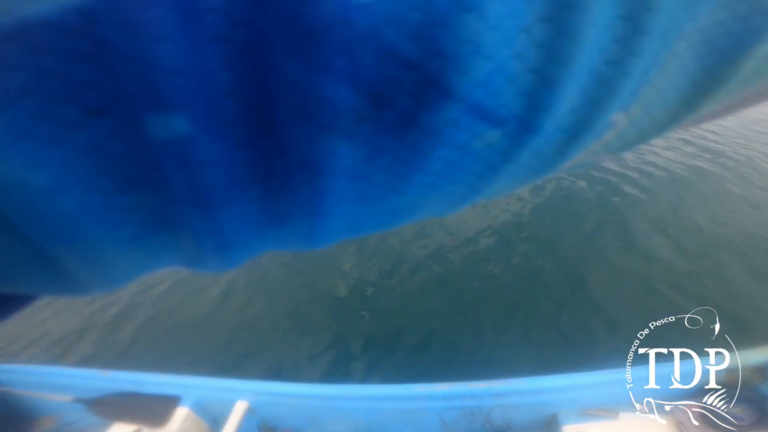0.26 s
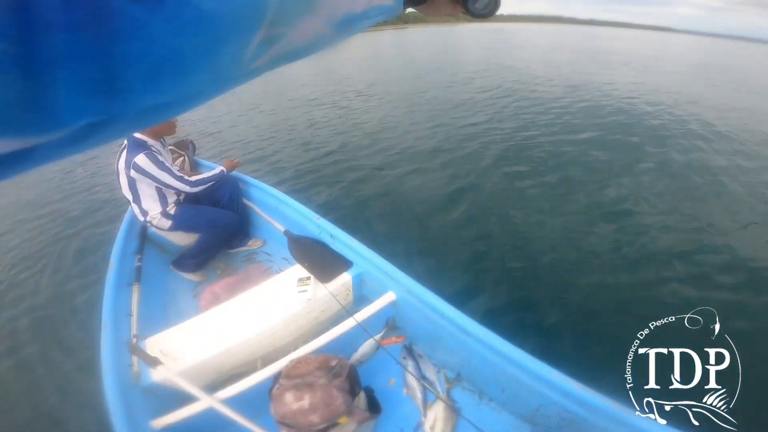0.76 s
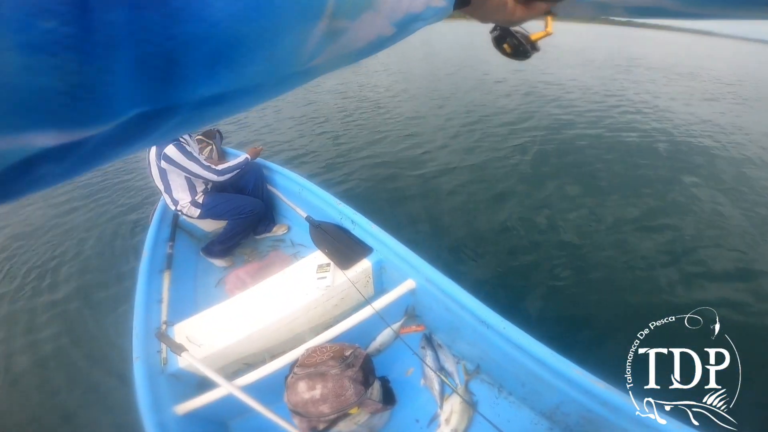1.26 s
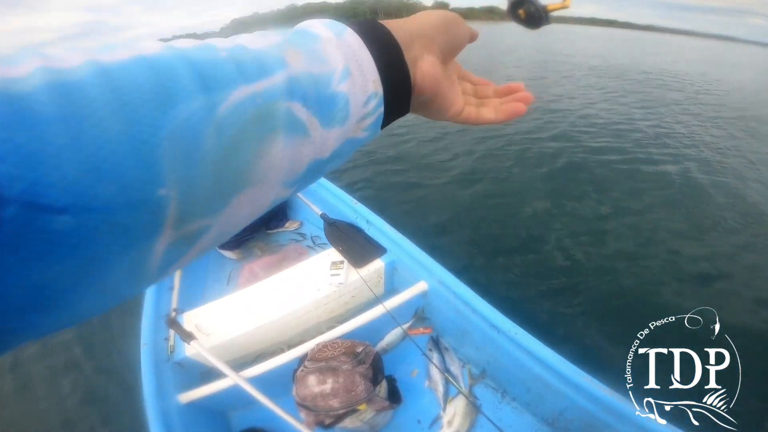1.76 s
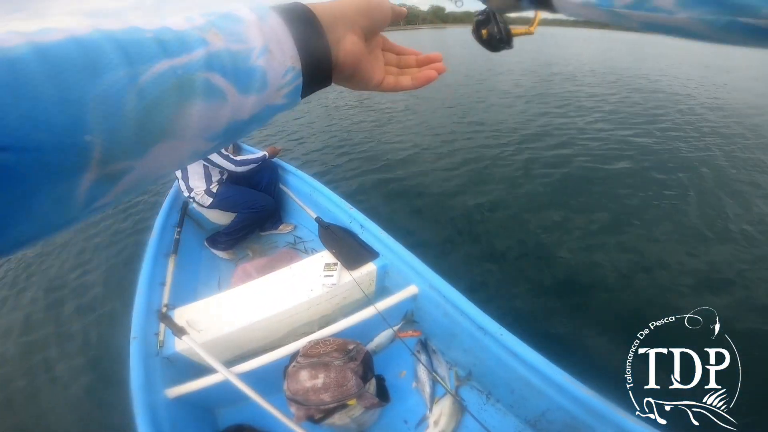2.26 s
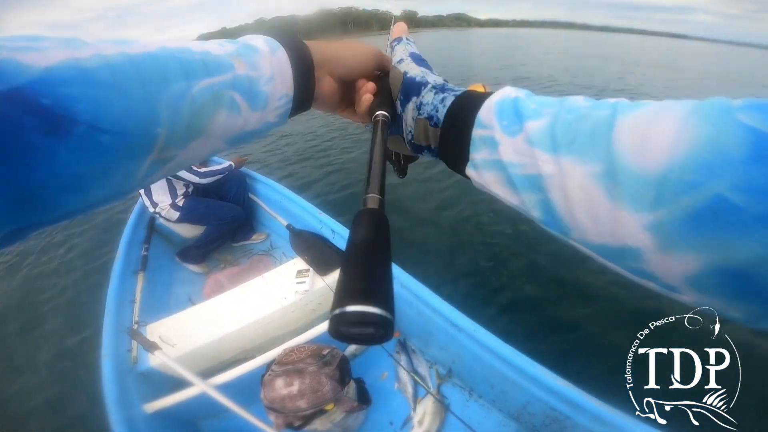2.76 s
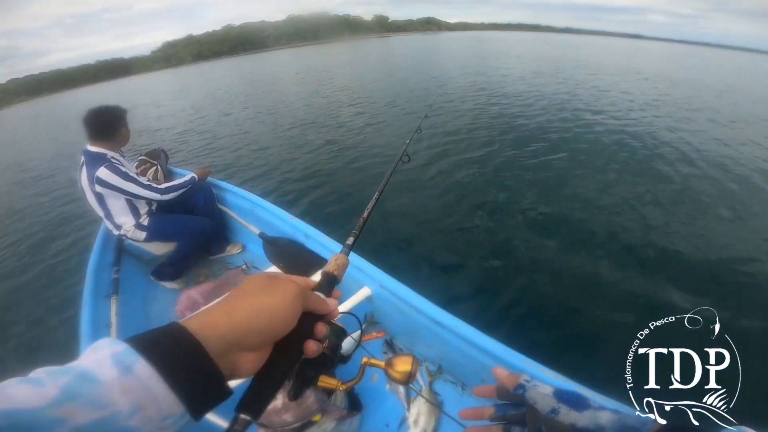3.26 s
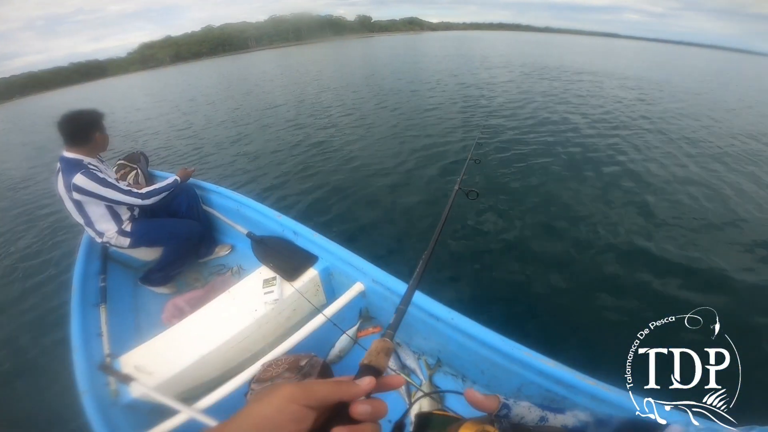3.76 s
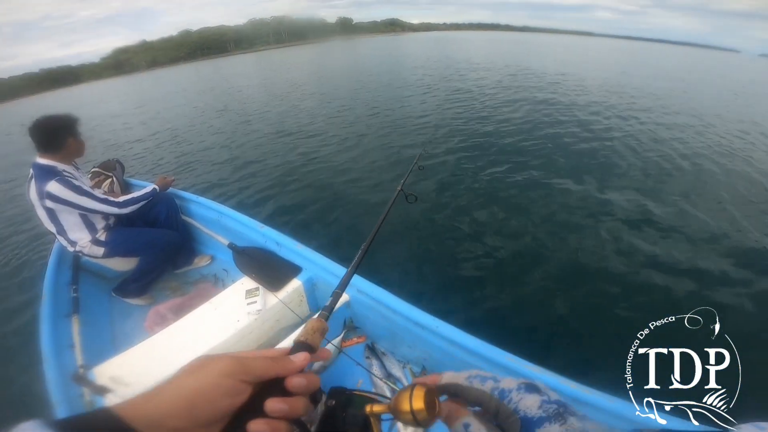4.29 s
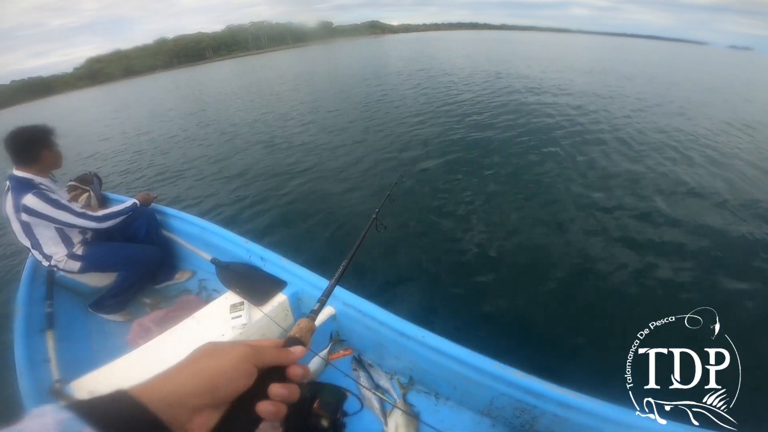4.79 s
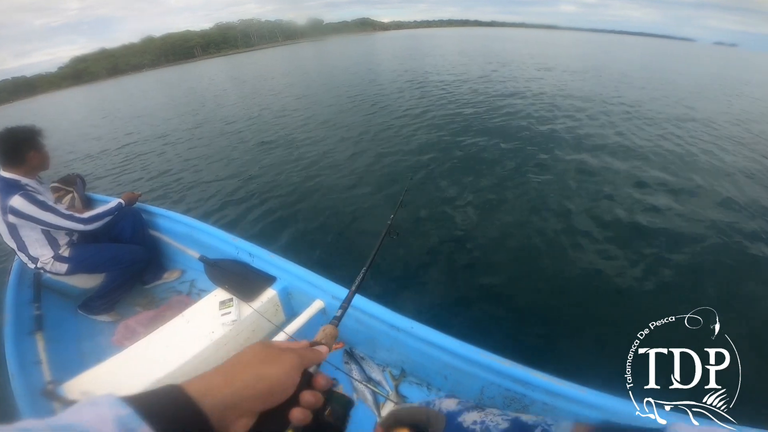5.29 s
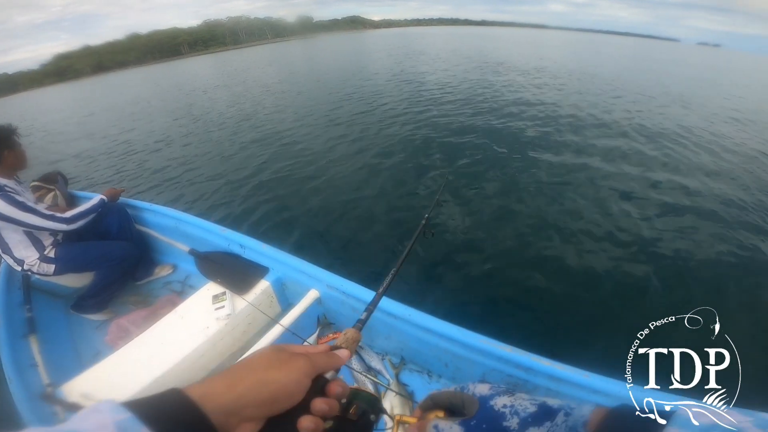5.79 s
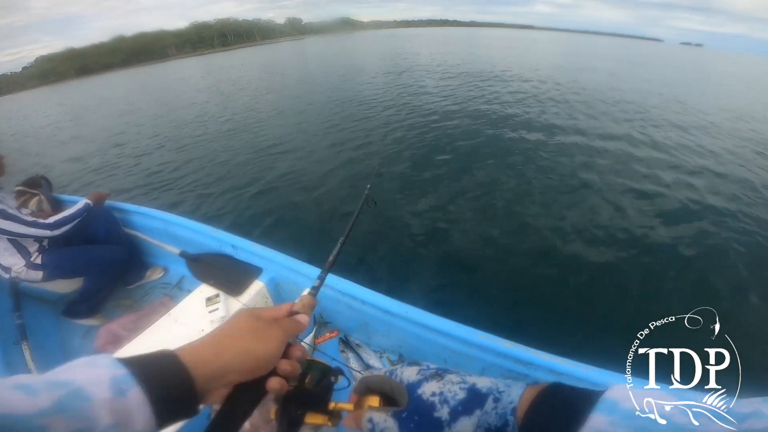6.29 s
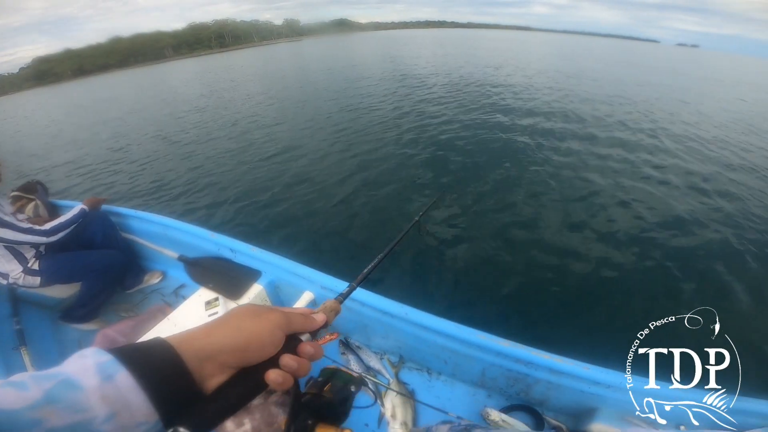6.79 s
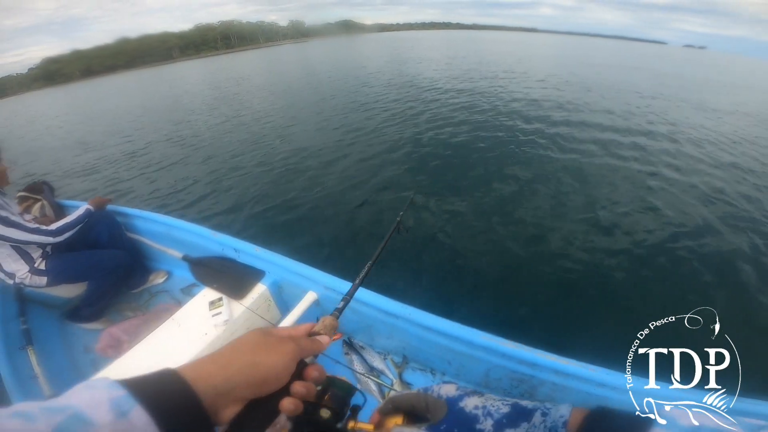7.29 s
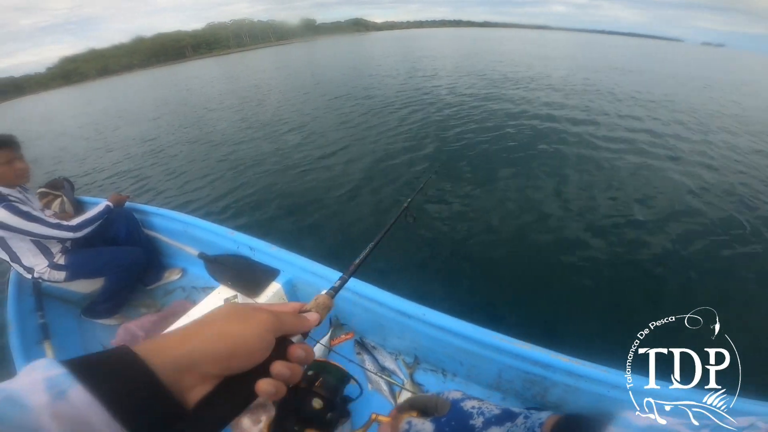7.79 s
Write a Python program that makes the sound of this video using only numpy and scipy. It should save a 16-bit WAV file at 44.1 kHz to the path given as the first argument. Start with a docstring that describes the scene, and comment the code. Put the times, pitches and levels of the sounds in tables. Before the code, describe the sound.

Muffled fabric rub and jolting thumps on a sealed chest-worn camera, scattered ticks, one soft metallic reel snap, faint water wash beneath.

```python
"""Shirt and strap rub, tick and creak on a small sealed camera, strapped to an angler's chest in an open boat.
The rub is clumped noise and the ticks are short grainy blows, both ringing the modes of the housing.
Body jolts and knocks are brief low swings; the reel's bail snaps shut once, as three noise bursts ringing
metal modes. Far below lie a wash of banded noise for water and air, a thin whine, short pure gurgles and hiss.
"""
import sys
import numpy as np
from scipy import signal
from scipy.io import wavfile

SR = 44100
rng = np.random.default_rng(int(sys.argv[2]) if len(sys.argv) > 2 else 0)


def persist_wave(psi):
    """Save psi, clipped to +-1, as 16-bit WAV."""
    counts = np.round(np.clip(psi, -1, 1) * 32767).astype(np.int16)
    wavfile.write(sys.argv[1], SR, np.atleast_2d(counts).T)


N = 355005


def amp(db):
    """Decibels to gain."""
    return 10 ** (np.asarray(db) / 20)


def rms_one(x):
    """Scale to rms 1."""
    return x / np.sqrt(np.mean(x ** 2) + 1e-20)


def drift(rate_hz):
    """Slow chance movement with rms 1: noise through two poles at rate_hz, computed every 20 samples."""
    pole = np.exp(-2 * np.pi * rate_hz * 20 / SR)
    noise = rng.standard_normal(N // 20 + 4002)
    slow = signal.lfilter([1], [1, -2 * pole, pole * pole], noise)[4000:]  # skip the settling
    return np.interp(np.arange(N) / 20, np.arange(len(slow)), rms_one(slow))


def resonate(x, hz, width_hz, lead=0.0):
    """Two-pole resonance with gain near 1 on top, its ringing shifted ahead by lead radians."""
    r, w = np.exp(-np.pi * width_hz / SR), 2 * np.pi * hz / SR
    b = 2 * (1 - r) * np.array([np.cos(lead), -r * np.cos(w - lead)])
    return signal.lfilter(b, [1, -2 * r * np.cos(w), r * r], x + 1e-18)


def bands(spectrum, alike, patchy_db):
    """Stereo noise in half-octave bands, each flickering a little; rms 1."""
    hz, level_db = np.transpose(spectrum)
    edges, out = 30 * 2 ** np.arange(0, 8.6, .5), 0
    white = rng.standard_normal((2, 2, N))
    share = np.clip(alike, 0, 1)
    for k, (low, high) in enumerate(zip(edges, edges[1:])):
        if low < hz[-1]:
            band = signal.butter(3, [low, high], "band", fs=SR, output="sos")
            mid, side = signal.sosfilt(band, white[k % 2])
            level = np.interp(np.log(low * high) / 2, np.log(hz), level_db)
            gain = amp(level + patchy_db * drift(22))
            out = out + gain * (np.sqrt(1 + share) * mid + np.sqrt(1 - share) * side * [[1], [-1]])
    return rms_one(out)


def swings(rows, lopsided):
    """A few swings under a bell-shaped envelope for every row; lopsided is the share of the octave above."""
    t, out = np.arange(N) / SR, np.zeros(N)
    for s, level_db, hz, length in rows:
        near = slice(max(int((s - 2 * length) * SR), 0), int((s + 2 * length) * SR))
        u = t[near] - s
        swing = np.cos(2 * np.pi * hz * u) + lopsided * np.cos(4 * np.pi * hz * u)
        out[near] += amp(level_db) * np.exp(-np.log(16) * (u / length) ** 2) * swing
    return out


# Housing modes, from broad body modes up to the top, shared by ticks and rub:
# (frequency [Hz], nominal width [Hz], left level [dB], right level [dB], lead of right port [rad])
BODY_MODES = [(231, 178, 0, -1.5, 0.05), (589, 320, -3.5, -5.5, -0.2)]
LOW_MODES = [(1005, 133, -3, -5.5, 0.69), (1222, 277, 0.5, -2, 0.48), (1465, 183, -8, -3.5, 1.2),
             (1670, 260, -12, -13.5, 1.5)]
MIDDLE_MODES = [(2264, 880, -1, 0, 2.03), (2872, 328, 4, 0, 1.3), (3440, 370, -4.5, -14, 1.5),
                (3910, 560, -12.5, -11.5, 1.3)]
TOP_MODES = [(5050, 1400, -13, 5.5, 9.3), (6250, 1400, -8.5, -1, 0.8), (7200, 600, -10.5, -19.5, 9)]


def housing(drives, modes):
    """Each mode builds up and dies (a resonance applied twice), with its own level and phase at each port."""
    out = np.zeros((2, N))
    for drive, (hz, width_hz, left_db, right_db, lead) in zip(drives, modes):
        swing = resonate(drive, hz, 1.45 * width_hz)
        out[0] += amp(left_db) * resonate(swing, hz, 1.1 * width_hz)
        out[1] += amp(right_db) * resonate(swing, hz, 0.77 * width_hz, lead)
    return out


# Spectrum of water and air: (frequency [Hz], relative level per Hz [dB])
WASH_SPECTRUM = [(80, -36.5), (115, -28), (160, 2), (350, -9), (583, -11.5), (834, -32.5), (1240, -7.5),
                 (1920, -14), (4170, -35), (5840, -23.5), (9220, -58.5)]


def wash():
    """Water and air: flickering noise bands, mostly unlike at the two ports."""
    return amp(-66.5) * bands(WASH_SPECTRUM, alike=0.24, patchy_db=3.5)


# Faint whine ahead of the membrane: (frequency [Hz], width of each resonance [Hz], left rms level [dB])
WHINE_TONES = [(5695, 12, -81.5), (6835, 12, -85), (9110, 14, -87)]


def whine():
    """Noise through very narrow resonances gives thin unsteady tones, weaker and inverted at the right port."""
    out = 0
    for hz, width_hz, level_db in WHINE_TONES:
        noise = rng.standard_normal(N)
        out = out + amp(level_db) * rms_one(resonate(resonate(noise, hz, width_hz), hz, width_hz))
    return out * [[1], [-.3]]


# Short pure gurgles: (time [s], level [dB], frequency [Hz], length at half height [s])
GURGLE_TONES = [(3.56, -56, 523, .04), (3.74, -57, 436, .06), (3.90, -59, 472, .05),
                (3.95, -58.5, 520, .04), (4.14, -55.5, 516, .04)]


def gurgles():
    """Air pockets ring briefly under the hull, a little louder on the left."""
    return swings(GURGLE_TONES, lopsided=0) * amp([[.7], [-.7]])


# The bail snapping shut: (time [s], relative level [dB], treble tilt about 4 kHz [dB per octave])
BAIL_SNAPS = [(3.981, -26, 10), (3.999, -16.5, 6), (4.019, -35, 0)]
# Metal of the reel: (frequency [Hz], relative level [dB], nominal t60 [s]; it rings 3.8 times shorter)
REEL_MODES = [(1373, -24, 0.097), (1631, -14.5, 0.16), (1820, 4, 0.025), (2100, 4.5, 0.042),
              (2584, 2, 0.051), (2848, 0.5, 0.086), (3080, -13, 0.093), (3520, -0.5, 0.13),
              (3930, 2, 0.067), (5030, -23, 0.13), (5560, -2, 0.091), (6010, -6.5, 0.05),
              (6360, -8.5, 0.097), (6780, -25, 0.092), (7600, -27.5, 0.076), (8258, -25.5, 0.083)]


def bail():
    """Each snap rattles the reel's modes, then scatters about the hull as a short dense tail of noise."""
    s, level_db, tilt_db = np.transpose(BAIL_SNAPS)
    at, age = (s * SR).astype(int), np.arange(2500) / SR
    fade = np.exp(-age / 0.0039) + 0.33 * np.exp(-age / .009)
    rattle = rng.standard_normal((len(at), 2500)) * fade
    out = np.zeros((2, N))
    for hz, mode_db, t60 in REEL_MODES:
        drive, width_hz = np.zeros(N), 3.8 * np.log(1000) / np.pi / t60
        gains = amp(level_db + mode_db + tilt_db * np.log2(hz / 4000) + 9.5)
        for i, burst, gain in zip(at, rattle, gains):
            drive[i:i + 2500] += gain * burst
        left = resonate(drive, hz, width_hz)
        right = resonate(drive, hz, width_hz, lead=rng.uniform(0, 2.56))
        out += [left, right]
    return out


def sway(rumble_db):
    """Deep wobble between jolts: noise rung twice at 19 Hz, following 0.22 of the rumble's swing in dB."""
    hz, width_hz = 19, 12
    wobble = resonate(resonate(rng.standard_normal(N), hz, width_hz), hz, width_hz)
    return amp(-49.5 + 0.22 * (rumble_db + 56)) * rms_one(wobble)


# Jolts through the chest: (time [s], level [dB], frequency [Hz], length at half height [s])
JOLTS = [(0.432, -31.5, 36, 0.17), (0.602, -31.5, 12, 0.091), (0.718, -13.5, 16.3, 0.082),
         (0.802, -12.5, 17.8, 0.16), (0.92, -19, 19, 0.065), (1.063, -22.5, 13.7, 0.13),
         (1.227, -30, 13, 0.16), (1.932, -34, 15.5, 0.092), (2.493, -36.5, 19, 0.13),
         (3.154, -28.5, 25.4, 0.13), (3.447, -32.5, 26, 0.087), (3.717, -32.5, 12.6, 0.16),
         (4.235, -30.5, 20.6, 0.092), (4.622, -37.5, 16.3, 0.15), (4.791, -29, 14, 0.1),
         (5.353, -27, 17.7, 0.083), (5.58, -35.5, 13.7, 0.14), (5.926, -31.5, 29, 0.096),
         (6.347, -34, 17, 0.067), (6.508, -27, 12.8, 0.14), (6.712, -28, 15.3, 0.11),
         (7.102, -33.5, 19.6, 0.079), (7.39, -44.5, 18.7, 0.19), (7.683, -30, 19, 0.073)]
# Dull knocks against the housing, same columns
HOUSING_KNOCKS = [(.4205, -14, 101, 0.005), (.728, -14, 94, 0.048), (.7578, -2.5, 1022, .0037),
                  (.764, -19.5, 286, 0.014), (.78, -37, 508, 0.033), (3.79, -37, 104, 0.028),
                  (3.84, -32.5, 96, 0.0099), (4.083, -27.5, 92, 0.011), (4.246, -25, 1000, 0.0046),
                  (5.81, -39, 100, 0.011), (6.337, -29.5, 142, 0.017)]


def thumps(rumble_db):
    """The chest pushes the whole housing; now and then something knocks against it, with opposite sign."""
    jolts = swings(JOLTS, lopsided=.2)
    knocks = swings(HOUSING_KNOCKS, lopsided=0.039)
    return (jolts - knocks + sway(rumble_db)) * amp([[.9], [-.9]])


def creaks(rub_db):
    """Small chance ticks, one in each fifth of a second, as loud as the rub allows; columns as for the ticks."""
    per_s = 5
    draw = rng.random((int(per_s * N / SR), 4))
    s = (np.arange(len(draw)) + draw[:, 0]) / per_s
    level_db = rub_db[(s * SR).astype(int)] + 14 - 9.1 * draw[:, 1]
    centre_hz = 1000 * 1.5 ** draw[:, 2]
    bright_db = -20 + 10 * (draw[:, 3] - .5)
    return np.transpose([s, level_db, centre_hz, bright_db])


# Clear ticks of strap, mount and rod:
# (time [s], relative level [dB], centre frequency [Hz], relative brightness [dB])
CLEAR_TICKS = [(0.3972, -25, 1290, -17), (0.417, -18, 1520, -12.5), (0.636, -32, 1320, -22),
               (0.755, -14, 1404, -11), (0.9566, -25, 970, -17.5), (1.1393, -31, 1300, -9.5),
               (1.2096, -39.5, 1050, -11), (2.113, -26.5, 1160, -22), (2.1658, -11.5, 1480, -16),
               (2.5222, -28.5, 1210, -24), (2.584, -30, 1230, -26), (2.9213, -25, 1420, -18),
               (2.9298, -23.5, 1480, -17.5), (2.9803, -19.5, 1400, -18.5), (2.9884, -21.5, 1350, -14),
               (3.274, -13.5, 1430, -6.5), (3.3387, -16.5, 1450, -8.5), (3.547, -28.5, 1260, -17),
               (3.9354, -31, 1190, -12), (3.946, -32.5, 1430, -11.5), (4.0752, -34.5, 1180, -19),
               (4.2246, -37, 1470, -27), (4.2432, -15, 1380, -21.5), (4.2896, -33, 1450, -14),
               (4.334, -34.5, 1300, -13), (4.4951, -30, 1430, -15), (4.554, -26, 1076, -38),
               (4.8048, -27, 1320, -17.5), (4.8204, -31.5, 1400, -17), (5.2425, -29, 1230, -21),
               (5.7982, -35, 1210, -24.5), (5.9636, -31, 1170, -34), (6.003, -36, 1190, -15),
               (6.2891, -38, 1150, -20), (6.3025, -29, 1260, -18), (6.316, -19.5, 1500, -17.5),
               (6.3265, -17, 993, -22), (6.3563, -32, 1400, -15), (6.383, -32.5, 1230, -12),
               (6.4221, -26.5, 1360, -25), (6.4496, -35, 1420, -14), (6.615, -35, 1480, -31),
               (6.6732, -27, 1450, -24), (7.02, -35.5, 1290, -25), (7.0575, -29.5, 1250, -19),
               (7.1159, -27, 1280, -19), (7.124, -34.5, 1470, -17), (7.1718, -36, 1250, -23),
               (7.1862, -33.5, 1230, -22), (7.216, -38.5, 1300, -15), (7.2393, -35.5, 1210, -22)]


def ticks(rub_db):
    """Each tick is a soft blow with a short grainy aftermath; it favours the low modes near its centre."""
    s, level_db, centre_hz, bright_db = np.transpose(np.vstack([CLEAR_TICKS, creaks(rub_db)]))
    at, modes = (s * SR).astype(int), LOW_MODES + MIDDLE_MODES + TOP_MODES + BODY_MODES
    # the low modes' own left level is taken out, so only nearness to the centre counts there
    colour_db = [-75.0 * np.log2(mode[0] / centre_hz) ** 2 - mode[2] for mode in LOW_MODES]
    colour_db += [bright_db] * len(MIDDLE_MODES)
    colour_db += [bright_db - 30.0] * len(TOP_MODES)
    colour_db += [np.full(len(s), -19)] * len(BODY_MODES)      # dull thud under each tick
    fade = np.exp(-np.arange(900) / SR / .004)
    grain = .035 * rng.standard_normal((len(at), len(modes), 900)) * fade
    # the blow itself; neighbouring modes swing in opposition
    grain[:, ::2, 0] = 1
    grain[:, 1::2, 0] = -1
    grain *= amp(2.53 * rng.standard_normal((len(at), len(modes), 1)))      # every tick lands on another spot
    drives = np.zeros((len(modes), N + 900))
    mode_levels_db = np.transpose(level_db + 33 + np.array(colour_db))
    for i, burst, levels in zip(at, grain, mode_levels_db):
        drives[:, i:i + 900] += amp(levels)[:, None] * burst
    # the blow travels through strap and mount, so each mode takes a few cycles to build
    softened = [resonate(d[:N], mode[0], 1.47 * mode[1]) for d, mode in zip(drives, modes)]
    return housing(softened, modes)


def top_band(scratch_db):
    """A thin hissy band high in the treble, around 9 to 13 kHz, swells with the scratch and flickers a little."""
    band = signal.butter(4, [9300, 13400], "band", fs=SR, output="sos")
    noise = rms_one(signal.sosfilt(band, rng.standard_normal((2, N))))
    return amp(1.32 * scratch_db - 24.5 + 3.0 * drift(20)) * noise


# Airy puffs of rod and line cutting the air: (time [s], level [dB], length at half height [s])
AIR_PUFFS = [(0.578, -59, 0.023), (2.35, -74, .1), (4.334, -62, 0.02), (5.358, -72.5, .06),
             (5.924, -73.5, 0.087), (6.525, -60, 0.029), (7.427, -79, 0.055), (7.83, -76.5, 0.053)]


def air_puffs():
    """Bell-shaped gain for the airy top as rod and line cut the air."""
    t = np.arange(N) / SR
    return sum(amp(db) * np.exp(-np.log(16) * ((t - at) / length) ** 2) for at, db, length in AIR_PUFFS)


# Steady rubbing of the shirt: (time [s], relative rub level [dB], relative dull rumble level [dB])
STEADY_RUB = [(0.0, -28.5, -29.5), (0.2, -30, -35.5), (0.3, -34, -35), (0.36, -51, -41),
              (0.47, -41.5, -34.5), (0.661, -50, -36.5), (0.76, -52, -20.5), (0.82, -49.5, -39.5),
              (1.2, -62.5, -59), (1.4, -55, -53), (1.52, -47, -52), (1.98, -45.5, -44.5), (2.081, -54, -50),
              (2.12, -45.5, -49), (2.3, -43, -48.5), (2.44, -43.5, -46), (2.5, -51.5, -49),
              (2.8, -46.5, -51.5), (3.0, -42.5, -44), (3.14, -28, -36.5), (3.248, -29, -36.5),
              (3.28, -47, -42), (3.42, -34.5, -40), (3.5, -41, -43.5), (3.54, -58, -52.5),
              (4.2, -53.5, -59.5), (4.6, -60, -58.5), (6.9, -61.5, -80), (6.999, -57.5, -67),
              (7.3, -55.5, -71.5), (7.55, -64, -74.5), (8.05, -62, -73)]
# Single drags of the strap as the arms move: (peak time [s], relative rub level [dB],
# relative rumble level [dB], rise over 20 dB of rub [s], fall over 20 dB of rub [s])
STRAP_DRAGS = [(0.42, -33, -32, 0.13, 0.13), (0.56, -29.5, -38, 0.14, 0.1),
               (0.741, -25, -20.5, 0.18, 0.024), (0.9, -46.5, -47.5, 0.12, 1), (3.341, -30, -35, 0.1, 0.11),
               (3.59, -42, -45.5, 0.11, 0.3), (3.83, -47.5, -55, 0.12, 0.038), (4.08, -46, -45, 0.17, .25),
               (4.3, -48.5, -49.5, 0.17, 0.16), (4.478, -44, -43.5, 0.075, 0.12),
               (4.869, -48.5, -39.5, 0.19, 0.051), (5.269, -48.5, -40, 0.17, 0.15),
               (5.45, -52, -51, 0.058, 0.052), (5.67, -52, -44.5, 0.37, 0.044),
               (5.81, -57, -47.5, 0.065, 0.055), (6.03, -50.5, -45.5, 0.21, 0.25),
               (6.319, -32, -41, 0.035, 0.074), (6.57, -49, -43.5, 0.46, 0.16),
               (6.66, -43.5, -37.5, .03, .12), (7.11, -61.5, -56.5, .15, 0.085)]
# Bright scratch against the rub: (time [s], level [dB])
SCRATCH_LEVEL = [(0, -13), (.7, -13), (1.4, -15), (2.3, -12.5), (3.3, -14), (4.1, -14.5), (5.5, -11.5),
                 (6.3, -14.5), (6.5, -12), (7.2, -13.5), (8.05, -14)]


def rubbing():
    """Levels in dB of rub, rumble and scratch: the powers of the steady rub and every drag add."""
    t = np.arange(N) / SR
    s, *columns = np.transpose(STEADY_RUB)
    power = [amp(np.interp(t, s, c)) ** 2 for c in columns]
    for at, rub_db, rumble_db, rise, fall in STRAP_DRAGS:
        shape_db = -20 * np.where(t < at, (at - t) / rise, (t - at) / fall)
        power[0] = power[0] + amp(rub_db + shape_db) ** 2
        power[1] = power[1] + amp(rumble_db + 1.47 * shape_db) ** 2
    rub_db, rumble_db = 10 * np.log10(power)
    scratch_db = rub_db + np.interp(t, *np.transpose(SCRATCH_LEVEL))
    return rub_db, rumble_db, scratch_db


# Dull rumble of the rub: (frequency [Hz], relative level per Hz [dB])
RUMBLE_SPECTRUM = [(35, -1), (60, 4), (95, 2), (140, -0.5), (200, -7), (290, -12.5), (400, -24)]


def rub(rub_db, rumble_db, scratch_db):
    """Fibres catch and slip: noise in short clumps shakes every mode a little differently."""
    swish_db = 0.72 * scratch_db - 26.5      # the airy top rises more slowly than the scratch
    clumps = amp(1.44 * drift(17) + 2.0 * drift(70))

    def shake(modes, clumping):
        """Separate noise for each mode, sharing the same clumps."""
        noise = rng.standard_normal((len(modes), N))
        return rms_one(housing(clumps ** clumping * noise, modes))

    low, body = shake(LOW_MODES, 1), shake(BODY_MODES, 1)
    middle, top = shake(MIDDLE_MODES, 1), shake(TOP_MODES, 0.18)
    rumble = bands(RUMBLE_SPECTRUM, alike=0.98, patchy_db=2.5) * amp(3.5 * drift(16) + [[.8], [-.8]])
    return (amp(rub_db + 2.0) * low
            + amp(1.18 * rub_db - 2.0) * body
            + amp(scratch_db + 6.5) * middle
            + (amp(swish_db) + air_puffs()) * top
            + amp(rumble_db + 1.82) * rms_one(rumble))


def scene():
    """All sources at the two ports; the sealing membrane dulls most, the bail's snap rolls off more gently."""
    rub_db, rumble_db, scratch_db = rubbing()
    background = wash() + whine() + gurgles()
    sealed = background + thumps(rumble_db) + ticks(rub_db) + rub(rub_db, rumble_db, scratch_db)
    dulled = signal.sosfilt(signal.butter(8, 7860, fs=SR, output="sos"), sealed)
    snap = signal.sosfilt(signal.butter(3, 7000, fs=SR, output="sos"), bail())
    return dulled + snap + top_band(scratch_db)


def record(dry):
    """The microphones add a dull hiss, loud peaks are rounded below 0.97 and the top is cut."""
    hiss_db, overload, cutoff_hz = -86, .97, 16000
    hiss = amp(hiss_db) * rms_one(signal.lfilter([1], [1, -.7], rng.standard_normal(dry.shape)))
    rounded = dry / (1 + (np.abs(dry) / overload) ** 4) ** (1 / 4)
    top_cut = signal.cheby2(10, 60, cutoff_hz, fs=SR, output="sos")      # 60 dB down from the cutoff
    return signal.sosfilt(top_cut, rounded + hiss)


dry = scene()
out = record(dry)
persist_wave(out)
```